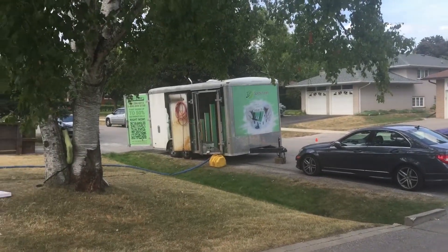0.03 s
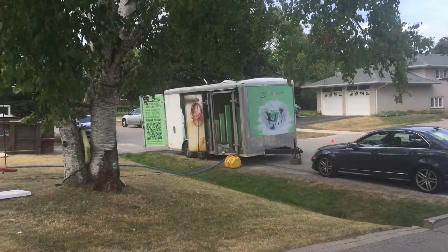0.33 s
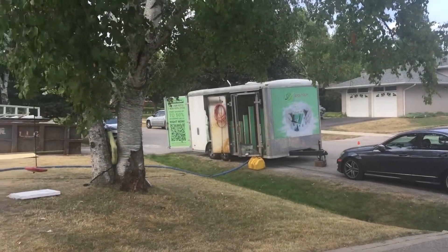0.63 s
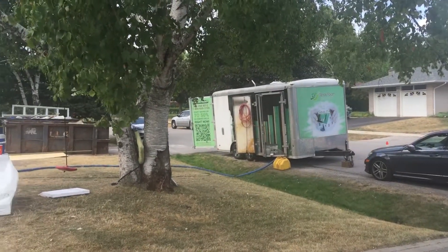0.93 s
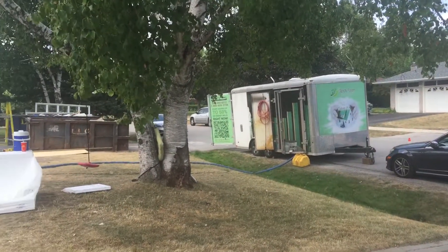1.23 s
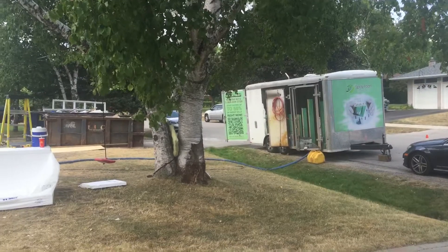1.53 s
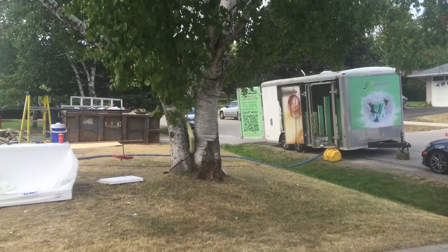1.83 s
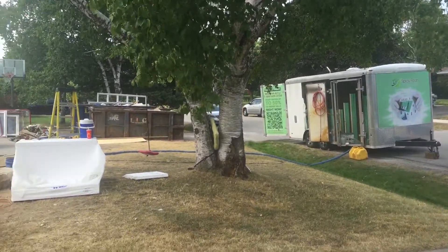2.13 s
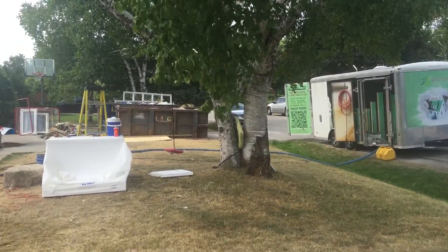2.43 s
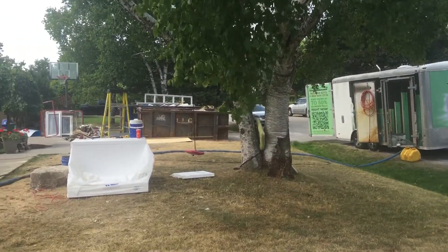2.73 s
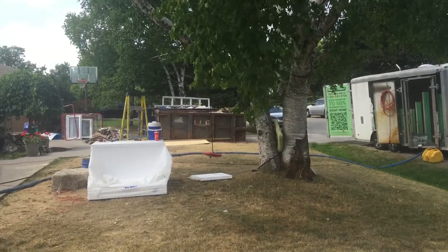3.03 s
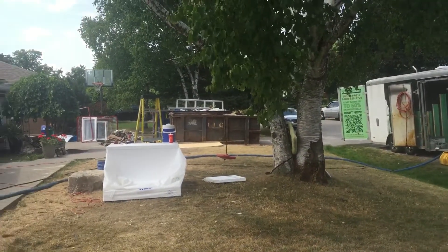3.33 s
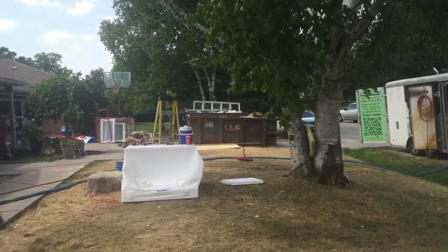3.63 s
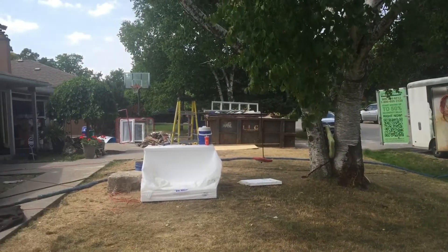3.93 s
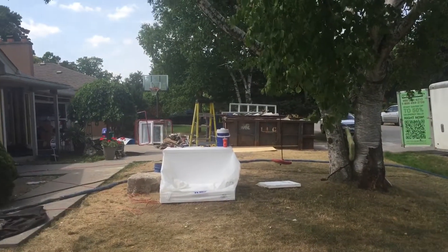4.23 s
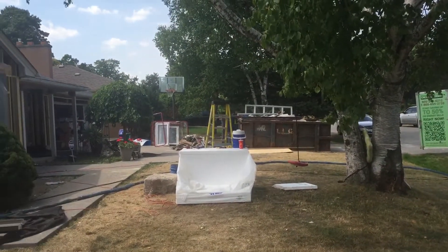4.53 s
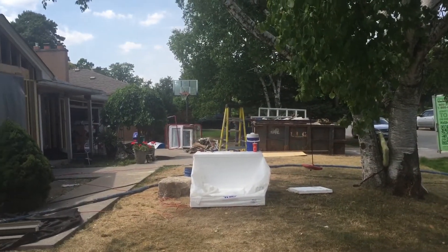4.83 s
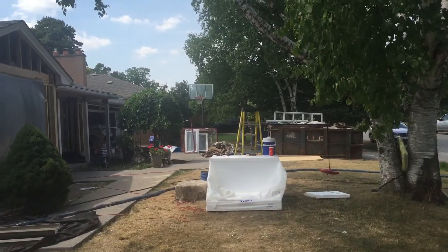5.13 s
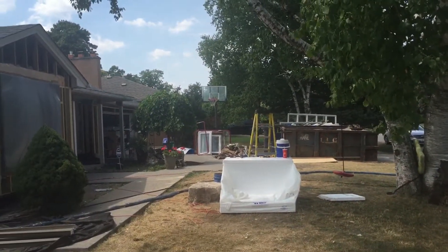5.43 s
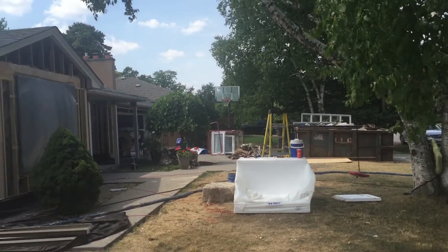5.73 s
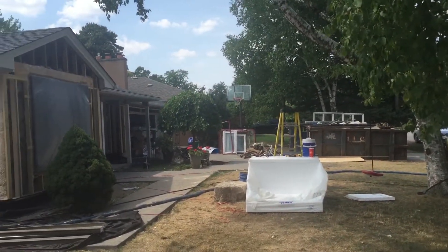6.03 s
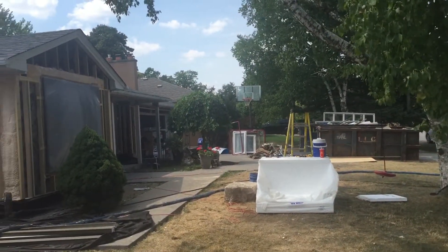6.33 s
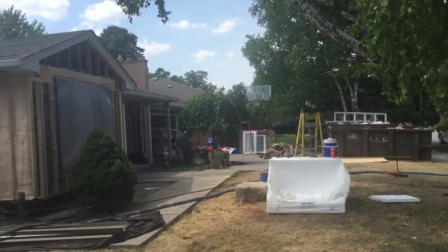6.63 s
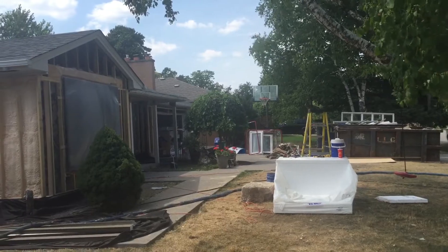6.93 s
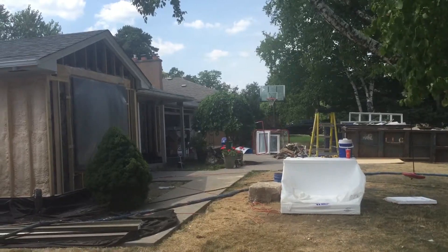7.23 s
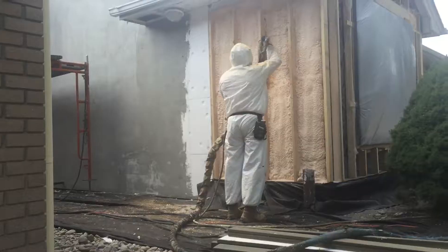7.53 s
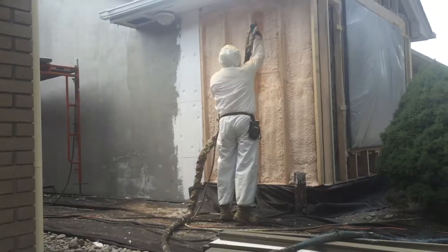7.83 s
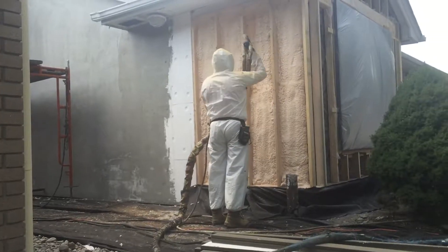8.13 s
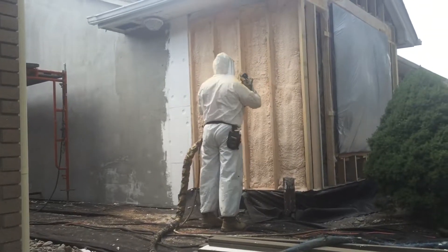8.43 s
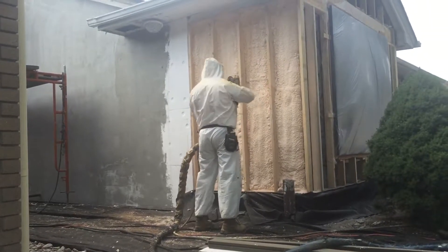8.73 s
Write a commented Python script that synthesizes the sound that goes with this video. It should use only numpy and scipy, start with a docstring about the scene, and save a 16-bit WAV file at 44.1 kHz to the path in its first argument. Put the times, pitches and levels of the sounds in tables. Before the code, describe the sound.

A generator and an air compressor throb in a trailer at an outdoor building site, while another motor hums, speeds up slightly and fades. A foam insulation gun hisses constantly, growing brighter. It lets out two pairs of short, sharp air blasts. Then, closer to the house wall, foam sprays briefly with a faint splutter and ends in one more blast. The hiss and drone carry on, the microphone level dipping under each blast.

```python
"""A generator and an air compressor throb in a trailer, heard from the street, where another motor
speeds up and fades. Purge air hisses from a foam insulation gun, brighter when its nozzle faces the
listener. From the yard, the trigger lets out short, sharp blasts of air that drain the hose.
Close to the house wall, foam sprays briefly, splutters and ends in one more blast.
The microphone's gain control ducks under the blasts."""
import sys
import numpy as np
from scipy import signal
from scipy.fft import rfft, irfft
from scipy.io import wavfile
from scipy.ndimage import uniform_filter1d

SR = 44100
rng = np.random.default_rng(int(sys.argv[2]) if len(sys.argv) > 2 else 0)


def wrap_up_sound(samples):
    """Save the sound to the file named by the first command line argument, as 16-bit audio."""
    columns = np.atleast_2d(samples).T
    # keep every value between -1 and 1, then stretch to whole-number steps
    tamed = np.clip(columns, -1, 1)
    steps = np.round(tamed * 32767).astype(np.int16)
    wavfile.write(sys.argv[1], SR, steps)


N = 392490

YARD_FROM_S, WALL_FROM_S, FOAM_ENDS_S = 1.42, 7.457, 7.87
GENERATOR_HZ, COMPRESSOR_HZ = 15.265, 12.18  # cycle rates
STREET_IN_STEP_S, YARD_IN_STEP_S = .942, 3.55  # strokes of both machines coincide

# Nozzle aim. Each row: time in seconds, top-octave gain in dB (0 = facing the listener).
NOZZLE_AIM = [(3.2, -6), (4.0, -4), (4.9, -4), (5.45, 0), (6.2, -1.3), (6.5, -3.5), (6.75, -4.5), (7.1, 0),
              (7.3, -2.6), (8.03, -1), (8.09, -0.3), (8.45, -2), (8.68, -6.5), (8.9, -5.5)]
# Jet spectra. Each row: frequency in Hz, relative level in dB.
PURGE_YARD_SPECTRUM = [(1200, -30), (2200, -7), (3000, -6), (3750, -8.5), (4350, -8.5), (4950, -11.5),
                       (5700, -5.5), (6700, -1.5), (7600, -3), (8800, 0.5), (9700, -1.5), (10450, -4),
                       (11400, 0), (13400, 1), (15700, -2.5)]
PURGE_WALL_SPECTRUM = [(1200, -23), (2800, -13.5), (4200, -5.5), (4900, -8), (5600, -4), (7500, -5.5),
                       (9600, -.5), (10450, -3.5), (11400, -0.5), (13400, 2), (15700, 0.5)]
FOAM_SPECTRUM = [(400, -29), (900, -9.5), (1700, -6), (2400, -9), (3200, -5.5), (4100, 0), (4800, -1),
                 (5700, 1.5), (7500, -2), (9500, 1.5), (10450, -7), (11500, -7.5), (15700, -8)]
# Trigger blasts. Each row: start in seconds, relative level in dB, rise and hold in seconds,
# decay in dB per second, treble gain in dB.
TRIGGER_BLASTS = [(5.733, -14.7, 0.015, 0.023, 218, 1.5), (5.861, -20, 0.025, 0.0043, 379, 0),
                  (6.237, -16.5, .007, .005, 133, -5), (6.362, -21.2, 0.017, .007, 302, -2),
                  (7.844, -13.4, 0.0089, 0.021, 410, 0)]
# Piston knocks and wet splutter. Each row: start in seconds, level in dB, rise and hold in seconds,
# decay in dB per second.
PISTON_KNOCKS = [(5.738, -33, 0.0037, 0.012, 230), (6.239, -27, .007, .006, 480)]
FOAM_SPLUTTERS = [(7.57, -40.5, 0.01, 0.039, 190)]
# Resonances of jet core, blasts, splutter and fan. Each row: centre in Hz, width in Hz, gain in dB.
CORE_MODES = [(5720, 600, -1), (6800, 1100, -0.53), (11800, 800, 1.8), (13300, 1300, 2)]
BLAST_YARD_MODES = [(1030, 500, -17.5), (2160, 490, -5.5), (3110, 330, -2.5), (3480, 600, -2),
                    (4200, 770, -4.5), (5270, 400, -3.5), (6200, 810, 1), (7500, 3500, -5.5),
                    (9400, 1800, -11), (11800, 1500, -9), (13300, 830, -4), (14400, 600, -11)]
BLAST_WALL_MODES = [(400, 250, -15), (960, 300, -7.5), (1470, 580, -12), (2160, 290, 0), (3450, 500, -1.5),
                    (4130, 430, 1), (5330, 330, 3.5), (6240, 870, -3), (7300, 550, -1), (8300, 600, -6),
                    (9570, 660, 0.5), (11600, 900, -10.5), (13500, 1300, -7.5), (15400, 700, -13)]
SPLUTTER_MODES = [(620, 66, 1), (1250, 300, -10), (1610, 260, 2), (2000, 250, -3)]
FAN_MODES = [(1014, 110, 2.5), (1150, 320, 1.5), (1550, 320, -5)]
# Gun body modes. Each row: frequency in Hz, relative level in dB.
GUN_BODY_MODES = [(520, -19), (628, -2), (668, 0), (705, -13)]
# Machine tones. Each row: multiple of the cycle rate, yard level in dB, wall level in dB.
GENERATOR_TONES = [(4, -35.5, -34), (5, -58, -60), (7, -66, -56), (8, -49.5, -51), (11, -67, -70),
                   (12, -66, -54), (13, -63.5, -62), (15, -64.5, -58.5), (16, -62.5, -55.5), (20, -60, -78),
                   (24, -63.5, -61), (32, -63, -73), (35, -63, -87), (36, -59.5, -78), (40, -65, -63.5),
                   (42, -63.5, -81), (48, -67.5, -82), (50, -60.5, -82), (59, -64, -62.5)]
COMPRESSOR_TONES = [(4, -52, -52), (6, -55, -61), (7, -53, -53), (8, -60, -68), (9, -61, -54),
                    (12, -57, -68), (14, -60, -68), (18, -65, -73), (26, -70.5, -51.5), (28, -69.5, -73)]
# Machine clatter spectra. Each row: frequency in Hz, density in dB per Hz.
CLATTER_YARD_SPECTRUM = [(20, -96), (38, -81), (60, -68), (115, -75), (220, -73), (300, -76), (420, -79.5),
                         (620, -75), (850, -79), (1050, -81), (1600, -80.5), (1950, -85.5), (4000, -87),
                         (15000, -100)]
CLATTER_WALL_SPECTRUM = [(20, -95), (40, -79), (80, -70), (130, -67.5), (220, -72), (330, -77),
                         (430, -80.5), (650, -79.5), (1200, -80), (1800, -80), (2600, -87), (15000, -102)]


def purge_air(by_wall, released):
    """The idle gun hisses, louder and brighter as listener and nozzle turn toward each other."""
    aim_db = np.interp(clock(), *np.transpose(NOZZLE_AIM))
    facing_away = 1 - ramp(0, 3.6)
    away_top_db = -3 * facing_away
    distance_top_db = -1.5 * in_street()
    hiss_db = .42 * aim_db - 4.6 * facing_away
    top_db = aim_db + away_top_db + distance_top_db
    yard = jet(hiss_db - 37.5, top_db - 33.5, PURGE_YARD_SPECTRUM, flutter_db=.55, echo=.59)
    yard += jet_core(aim_db) * from_db(away_top_db)
    wall = jet(hiss_db - 35, top_db - 29.4, PURGE_WALL_SPECTRUM, flutter_db=.55, echo=.38)
    return hose_pressure() * (yard * (1 - by_wall) + wall * released)


def foam(by_wall, released, swell_db_per_s=12.5):
    """Foam rushes onto the wall, swelling until the trigger is let go."""
    hiss_db = -33.5 + swell_db_per_s * since(WALL_FROM_S)
    spray = jet(hiss_db, top_db=-29.5, spectrum=FOAM_SPECTRUM, flutter_db=.8, echo=.2)
    return spray * by_wall * (1 - released)


def jet(hiss_db, top_db, spectrum, flutter_db, echo, split_hz=10500):
    """Turbulent hiss; its top octave beams forward and has its own level."""
    top_share = 1 / (1 + (split_hz / bins_hz()) ** 20)
    hiss = 0
    for share, level_db in ((1 - top_share, hiss_db), (top_share, top_db)):
        band = irfft(white_spectrum() * colour(spectrum) * np.sqrt(share), N)
        hiss += from_db(level_db) * moving_echoes(band, echo, sway_s=.00011)
    return hiss * from_db(flutter_db * drift(22))


def jet_core(aim_db):
    """The jet's keen, narrow core, heard when the nozzle faces the listener."""
    core = irfft(white_spectrum() * resonances(CORE_MODES), N)
    return from_db(-37 + 3.6 * aim_db) * moving_echoes(core, echo=.55, sway_s=.00012)


def hose_pressure(sag_db=4, hold_s=.083, recovery_s=.045):
    """Purge air gain: each blast drains the hose, which then refills."""
    drained = [after(start_s) * (1 - ramp(start_s + hold_s, start_s + hold_s + recovery_s))
               for start_s, *_ in TRIGGER_BLASTS]
    return from_db(-sag_db * np.max(drained, axis=0))


def trigger_blasts(by_wall, split_hz=7000):
    """The valve lets out blasts of air, each with its own brightness."""
    yard = air_rush(BLAST_YARD_MODES, rough_db=1.4, echo=.47, spread_s=.014)
    wall = air_rush(BLAST_WALL_MODES, rough_db=1, echo=.33, spread_s=.006)
    rush = yard * (1 - by_wall) + wall * by_wall
    treble = irfft(rfft(rush) / (1 + (split_hz / bins_hz()) ** 4), N)
    body_gain = bursts([row[:-1] for row in TRIGGER_BLASTS])
    treble_gain = bursts([(start_s, level_db + treble_db, *shape)
                          for start_s, level_db, *shape, treble_db in TRIGGER_BLASTS])
    return from_db(.95) * (body_gain * (rush - treble) + treble_gain * treble)


def air_rush(modes, rough_db, echo, spread_s):
    """Ragged air through the gun's resonances, scattered by the building."""
    ragged = rng.standard_normal(N) * from_db(rough_db * drift(120))
    return unit_rms(irfft(rfft(ragged) * resonances(modes) * reflections(echo, spread_s), N))


def piston_knock(waver_db=2.5):
    """The piston hits its stop and rings a few close modes of the gun body."""
    ring = 0
    for hz, level_db in GUN_BODY_MODES:
        gain = from_db(level_db + waver_db * drift(30))
        ring += gain * np.sin(2 * np.pi * hz * clock() + drift(21))
    return bursts(PISTON_KNOCKS) * unit_rms(ring)


def splutter():
    """A wet splutter within the spray."""
    return bursts(FOAM_SPLUTTERS) * air_rush(SPLUTTER_MODES, rough_db=3, echo=.4, spread_s=.00515)


def machine(tones, cycle_hz, by_wall, waver_db, smear_rad):
    """Harmonics of a working cycle; high ones waver more, less so where the listener stands by the wall."""
    t, street, hum = clock(), in_street(), 0
    for multiple, yard_db, wall_db in tones:
        looseness = min(multiple / 12, 1) ** 3
        level_db = yard_db + (wall_db - yard_db) * by_wall
        level_db += waver_db * looseness * drift(1.14) * (1 - .5 * by_wall)
        wander_rad = smear_rad * looseness * (drift(.42) + rng.normal())
        street_tone, later_tone = (np.cos(2 * np.pi * multiple * cycle_hz * (t - in_step_s) + wander_rad)
                                   for in_step_s in (STREET_IN_STEP_S, YARD_IN_STEP_S))
        hum += np.sqrt(2) * from_db(level_db) * (street_tone * street + later_tone * (1 - street))
    return hum


def clatter(by_wall, firing_depth=.031, flicker_db=.9):
    """Valves and pistons repeat a rough pattern each cycle; exhaust and fan noise swell at each firing."""
    cycles = GENERATOR_HZ * clock() + .006 * drift(.68)
    pattern = rng.standard_normal(int(SR / GENERATOR_HZ))
    valves = pattern[(cycles % 1 * len(pattern)).astype(int) % len(pattern)]
    firing = 1 + firing_depth * np.cos(2 * np.pi * 4 * cycles)
    exhaust = unit_rms(rng.standard_normal(N) * firing)
    valve_share = .41 / (1 + (bins_hz() / 1400) ** 2)
    spectrum = np.sqrt(valve_share) * rfft(valves) + np.sqrt(1 - valve_share) * rfft(exhaust)
    spectrum *= np.sqrt(SR / 2)  # unit power per Hz
    yard = irfft(spectrum * colour(CLATTER_YARD_SPECTRUM), N)
    wall = irfft(spectrum * colour(CLATTER_WALL_SPECTRUM), N)
    noise = yard * (1 - by_wall) + wall * by_wall + cooling_fan(spectrum)
    return noise * from_db(flicker_db * drift(3.6))


def cooling_fan(spectrum, turn_away_s=3.15, fade_db_per_s=3.5):
    """The whirr leaves by the trailer door and fades as the listener turns away."""
    level_db = -52.7 - fade_db_per_s * since(turn_away_s)
    return from_db(level_db) * unit_rms(irfft(spectrum * resonances(FAN_MODES), N))


def trailer_boom(x, centre_hz=166, width_hz=77, gain_db=-5):
    """The open trailer faces the street, where its box lifts the low overtones."""
    boom = irfft(rfft(x) * resonances([(centre_hz, width_hz, gain_db)]), N)
    return x + boom * in_street()


def street_motor(idle_hz=67.1, full_hz=73.3, fade_db_per_s2=5, overtone_db=-19):
    """A fading hum beats against the generator's firing, faster as the motor gathers speed."""
    hz = idle_hz + (full_hz - idle_hz) * ramp(.145, .98)
    level_db = -41 - fade_db_per_s2 * clock() ** 2
    turns = np.cumsum(hz) / SR
    phase = 2 * np.pi * (turns - turns[int(STREET_IN_STEP_S * SR)])
    hum = np.cos(phase) + from_db(overtone_db) * np.cos(2 * phase)
    return np.sqrt(2) * from_db(level_db) * hum * in_street()


def moving_echoes(x, echo, sway_s, count=7):
    """Echo paths change length as gun and listener move, so their comb slides; unit power."""
    samples, mix = np.arange(N), x
    for lag_s in np.geomspace(.0007, .007, count) * rng.uniform(.8, 1.2, count):
        delay_s = lag_s + sway_s * drift(.81)
        mix = mix + echo / np.sqrt(count) * np.interp(samples - SR * delay_s, samples, x)
    return unit_rms(mix)


def reflections(echo, spread_s, count=14):
    """Comb spectrum of short echoes from ground, studs and walls."""
    signs = rng.choice([-1, 1], count)
    lags = (rng.uniform(.1, 1, count) * spread_s * SR).astype(int) + 1
    impulse = np.zeros(N)
    impulse[0] = 1
    impulse[lags] = echo * signs / np.sqrt(count)
    return rfft(impulse) / np.sqrt(1 + echo ** 2)


def bursts(rows):
    """Envelope of events that rise, hold and decay, summed in power."""
    power = 0
    for start_s, level_db, rise_s, hold_s, decay_db_per_s in rows:
        fall_db = np.minimum(decay_db_per_s * since(start_s + rise_s + hold_s), 150)
        power += (ramp(start_s, start_s + rise_s) * from_db(level_db - fall_db)) ** 2
    return np.sqrt(power)


def drift(rate_hz, hop=100, warmup=2000):
    """Smooth random wander of unit power."""
    pole = np.exp(-2 * np.pi * rate_hz * hop / SR)
    noise = rng.standard_normal(N // hop + 2 + warmup)
    slow = signal.lfilter([1], [1, -2 * pole, pole ** 2], noise)[warmup:]
    return np.interp(np.arange(N) / hop, np.arange(len(slow)), unit_rms(slow))


def colour(spectrum):
    """Gain per bin, interpolated over log frequency."""
    hz, db = np.transpose(spectrum)
    return from_db(np.interp(np.log(bins_hz()), np.log(hz), db))


def resonances(modes):
    """Gain per bin of broad peaks, summed in power."""
    peaks = (from_db(db) / (1 + (1.76 * (bins_hz() - hz) / width_hz) ** 2) for hz, width_hz, db in modes)
    return np.sqrt(sum(peak ** 2 for peak in peaks))


def white_spectrum():
    return rfft(rng.standard_normal(N))


def bins_hz():
    return np.maximum(np.arange(N // 2 + 1) * SR / N, 1)


def from_db(db):
    return 10 ** (db / 20)


def unit_rms(x):
    return x / np.sqrt(np.mean(x ** 2) + 1e-20)


def clock():
    return np.arange(N) / SR


def since(start_s):
    return np.maximum(clock() - start_s, 0)


def ramp(start_s, end_s):
    return np.clip((clock() - start_s) / (end_s - start_s), 0, 1)


def after(start_s):
    return ramp(start_s, start_s + .004)


def in_street():
    return 1 - after(YARD_FROM_S)


def scene():
    """Machines and gun, the same in both ears."""
    by_wall, released = after(WALL_FROM_S), after(FOAM_ENDS_S)
    trailer = machine(GENERATOR_TONES, GENERATOR_HZ, by_wall, waver_db=1.26, smear_rad=.98)
    trailer += machine(COMPRESSOR_TONES, COMPRESSOR_HZ, by_wall, waver_db=2.5, smear_rad=.7)
    trailer += clatter(by_wall)
    gun = purge_air(by_wall, released) + foam(by_wall, released)
    gun += trigger_blasts(by_wall) + piston_knock() + splutter()
    return np.tile(gun + trailer_boom(trailer) + street_motor(), (2, 1))


def gain_control(x, threshold_db=-23, slope=.36, release_db_per_s=15):
    """Loud sound turns the gain down at once; it creeps back afterwards."""
    power = np.maximum(uniform_filter1d(x[0] ** 2, size=400), 0)
    excess_db = np.maximum(10 * np.log10(power + 1e-12) - threshold_db, 0)
    release_db = release_db_per_s * clock()
    cut_db = np.maximum.accumulate(slope * excess_db + release_db) - release_db
    return x * from_db(-uniform_filter1d(cut_db, size=200))


def record(dry):
    """Gain control, then a steep low-pass at 15.8 kHz."""
    lowpass = signal.ellip(12, .1, 80, 15800, fs=SR, output="sos")
    return signal.sosfilt(lowpass, gain_control(dry))


dry = scene()
out = record(dry)
wrap_up_sound(out)
```